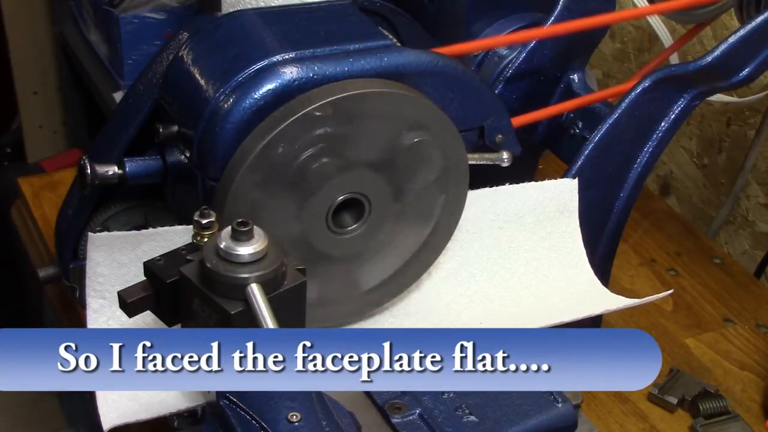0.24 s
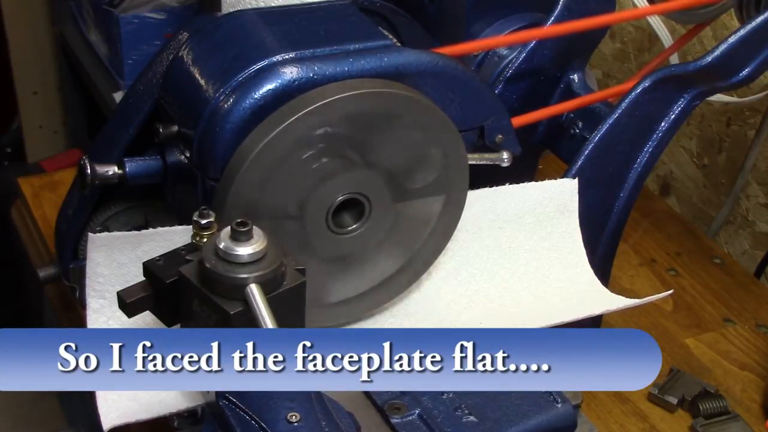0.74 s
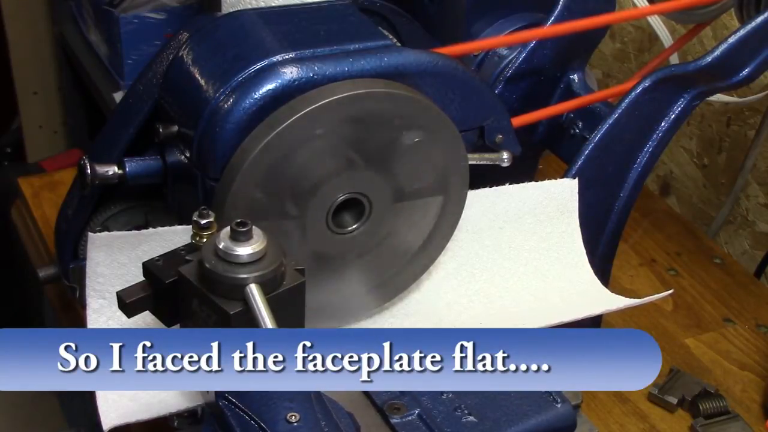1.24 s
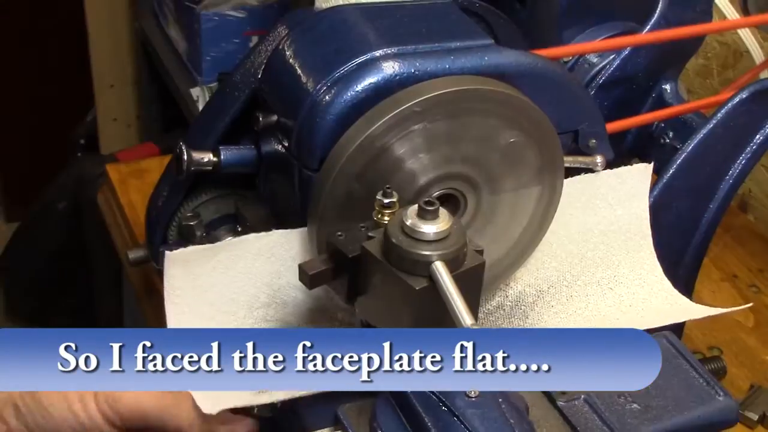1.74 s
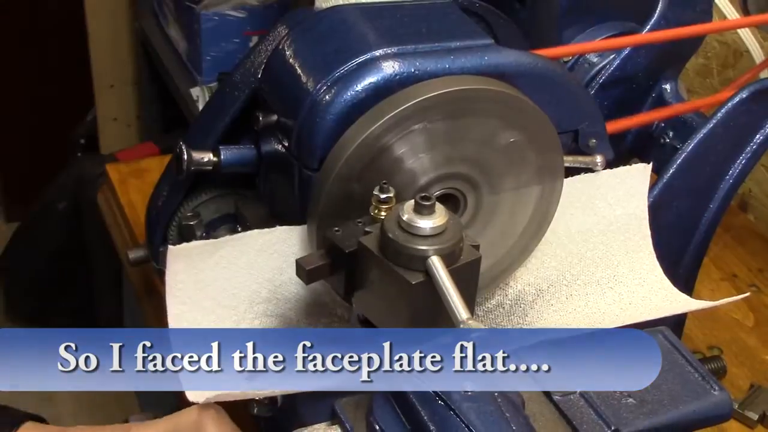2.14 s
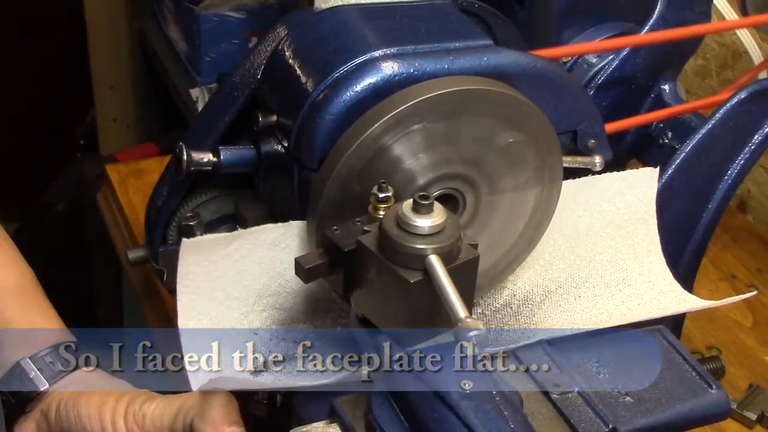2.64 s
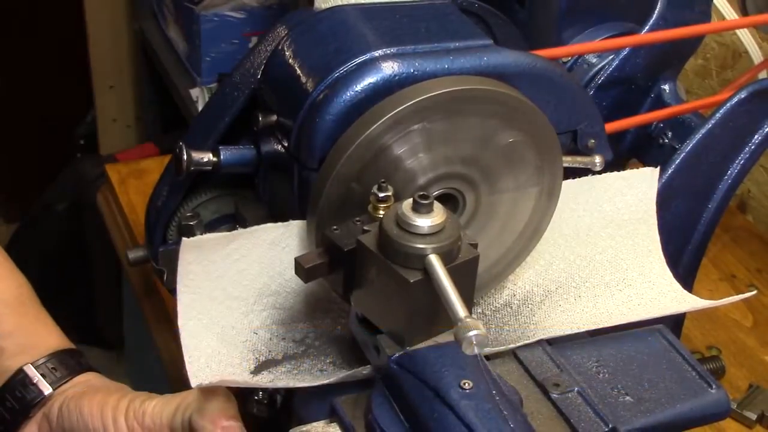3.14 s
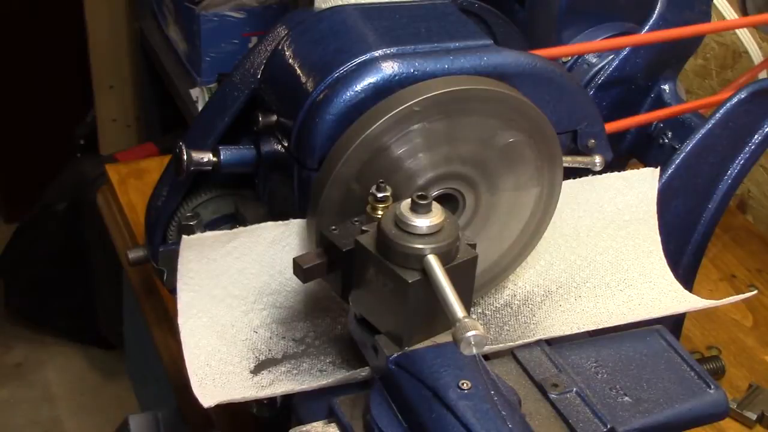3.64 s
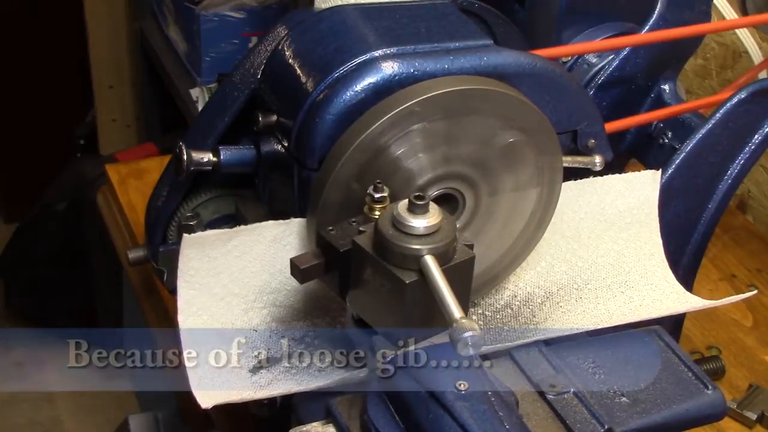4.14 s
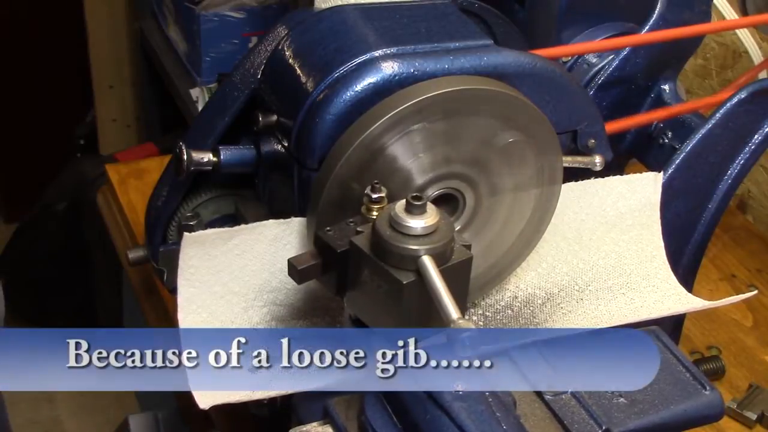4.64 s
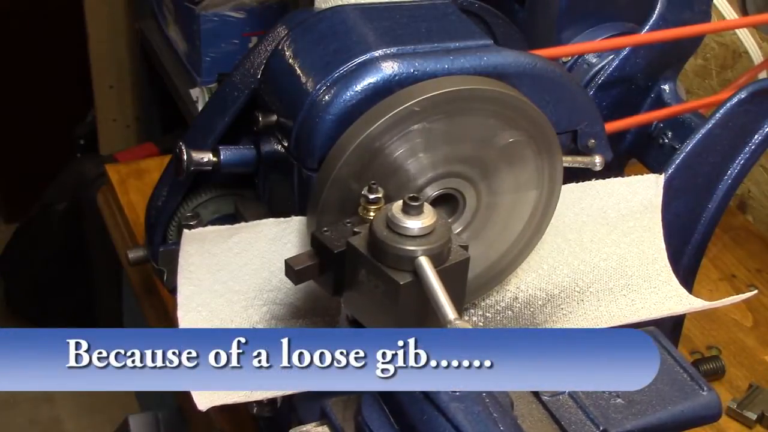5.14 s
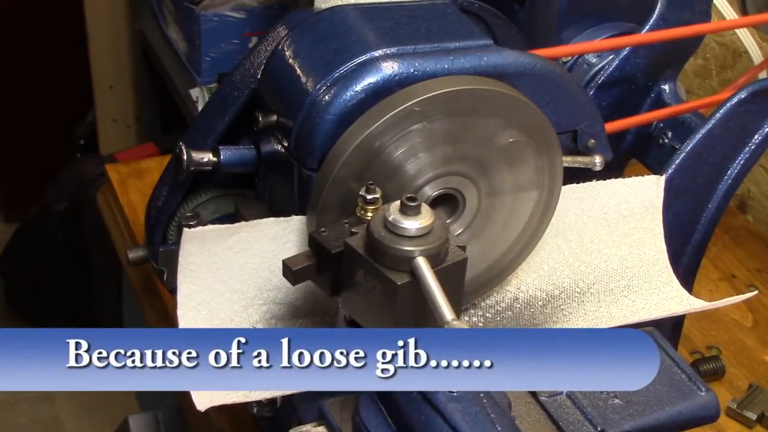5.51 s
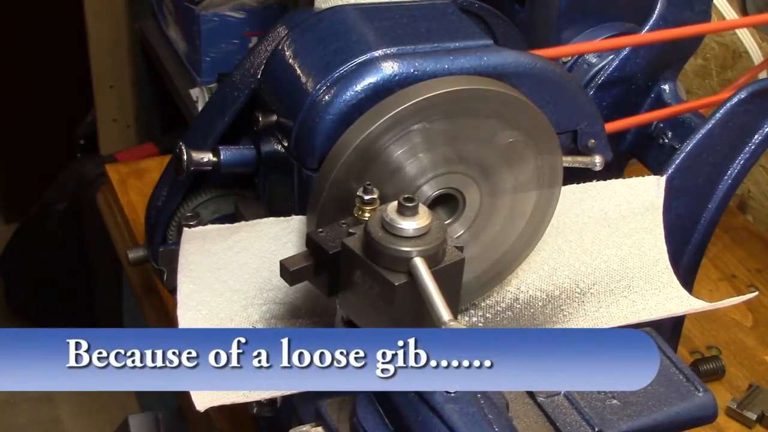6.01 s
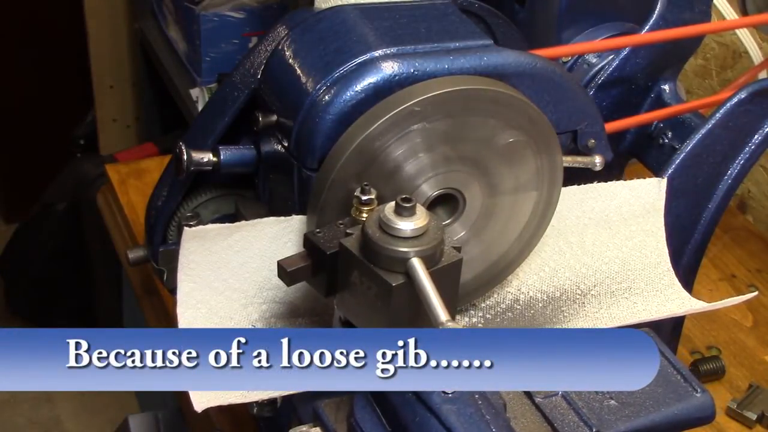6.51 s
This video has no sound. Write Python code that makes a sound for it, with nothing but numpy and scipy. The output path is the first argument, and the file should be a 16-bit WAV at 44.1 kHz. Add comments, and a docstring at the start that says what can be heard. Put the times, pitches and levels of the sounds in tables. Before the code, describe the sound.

Eight crackly metallic scrapes a second over motor rumble, then abruptly a fast-motion machining hiss with sinking whines, brief squeals and uneven chatter.

```python
"""A small lathe faces an iron plate in a home workshop. At normal speed the tool first scrapes one high spot
each turn: bursts of grit crackle and ring the plate's modes over the motor's filtered-noise rumble.
Then the work runs on in fast motion, every pitch raised many times: shaped noise hisses with a grain that
repeats each turn, gear whines (wavering sines) sink as the load slows the drive, and noise bursts knock.
As the tool goes in it squeals, a snag ticks once a turn, and the hiss swells where the tool chatters."""
import sys
import numpy as np
from scipy import signal
from scipy.io import wavfile
from scipy.ndimage import uniform_filter1d, map_coordinates

SR = 44100
rng = np.random.default_rng(int(sys.argv[2]) if len(sys.argv) > 2 else 0)


def int16_out(signal):
    """Quantize to a 16-bit WAV file."""
    q = np.round(np.clip(np.atleast_2d(signal).T, -1, 1) * 32767)
    wavfile.write(sys.argv[1], SR, q.astype(np.int16))


N = 298557
FAST_START_S = 1.619

# Motor rumble spectrum. Each row: frequency in Hz, relative density in dB per Hz.
MOTOR_SPECTRUM = [(15, -64), (25, -23.5), (240, 8), (378, 5), (762, -1), (1950, -3.5), (3090, -5.5),
                  (3530, -4), (4040, -8.5), (4870, -14), (5430, -13.5), (7910, -16), (11200, -20.5),
                  (13900, -24), (15500, -39)]
MOTOR_LEVEL_DB = -32
# Headstock casting resonances. Each entry: frequency in Hz.
HOUSING_HZ = [258, 770, 937, 1170, 2812]
# Their shape. Each row: width in Hz, lift in dB.
HOUSING_WIDTH_LIFT = [(49.7, 3), (40, 8.5), (25, 11), (59.6, 6.5), (25, 19)]

# Countershaft rate heard in fast motion. Each row: time in seconds, turns per second.
SHAFT_RATE = [(1.62, 194), (1.85, 187), (2.05, 183), (2.3, 180), (2.55, 177.5), (2.9, 175), (3.35, 172),
              (3.7, 168.5), (4.4, 166), (5.1, 163.5), (6, 162), (6.77, 161.5)]
# Plate rate heard in fast motion. Each row: time in seconds, turns per second.
PLATE_RATE = [(2.75, 165.3), (3.07, 161.7), (3.54, 160.4), (3.56, 155), (3.9, 155.3), (4.0, 154),
              (4.4, 152.5), (4.8, 151.5), (5.05, 150), (5.4, 148.7), (6.77, 148)]
# Gear whines. Each entry: multiple of the shaft rate.
GEAR_ORDERS = [2.85, 4, 5.7, 6.35, 7.3, 8, 8.5, 12, 17, 22, 23, 25, 28]
# Each row: level in dB, loudest time in seconds, time to fall 6 dB in seconds.
GEARS = [(-67, 2.05, 1), (-65.5, 3.07, 0.56), (-63, 2.1, .3), (-59, 1.9, 0.48), (-40.5, 1.22, 0.61),
         (-51.5, 1.6, 3.1), (-45.5, 2.93, 1.15), (-47, 1.75, 0.41), (-42.5, 1.7, 0.81), (-43, 1.52, 0.23),
         (-46, 2.8, 0.91), (-39, 2.34, 0.34), (-42, 7.1, 1.9)]
# Tones of steady pitch in fast motion, perhaps mains hum at 1200 Hz. Each entry: frequency in Hz.
STEADY_HZ = [1114, 1200, 1427]
# Each row: level in dB, loudest time in seconds, time to fall 6 dB in seconds.
STEADY_TONES = [(-61.5, 4.1, 6.8), (-56, 9.8, 15), (-48.5, 8.7, 3.6)]
# Tool squeals. Each entry: multiple of the plate rate.
SQUEAL_ORDERS = [11, 12, 13, 16, 17, 31]
# Each row: level in dB, loudest time in seconds, time to fall 6 dB in seconds.
SQUEALS = [(-39, 3.25, .2), (-46, 3.3, .2), (-38, 3.3, .22), (-36, 3.3, .25), (-39, 3.25, .2),
           (-36, 3.14, .06)]

# Knocks on the slide. Each row: start in seconds, level in dB, centre in Hz, hold end in seconds after
# the start, loss about one octave off in dB.
KNOCKS = [(2.257, -24.5, 3350, 0.0052, 78), (2.291, -20.5, 3400, 0.0016, 25),
          (2.2914, -18.5, 8100, .002, 10), (3.416, -15, 8300, 0.012, 7)]
# Snag ticks. Each row: time in seconds, level in dB.
SNAG_LEVEL = [(2.95, -45), (3.07, -23.5), (3.11, -30.5), (3.245, -22.5), (3.265, -54), (3.29, -21.5),
              (3.34, -28), (3.51, -27.5), (3.7, -43), (3.81, -32), (3.87, -42), (6.77, -38)]
SNAG_CONTACT_S = 3.0695  # a moment when the snag meets the tool

# High-spot bites, one a turn. Each row: time in seconds, entry click in dB, scrape crest in seconds after
# that time, crest in dB, treble share in dB, scrape t60 in seconds, exit click in dB.
BITES = [(0.066, -17.5, .017, -11, -4, 0.087, -30), (0.1882, -15.5, .013, -13.5, -3.5, 0.052, -16.5),
         (0.3068, -16, 0.013, -15.5, -0.5, 0.054, -18.5), (0.423, -17.5, 0.012, -12, -2.5, 0.1, -22),
         (0.542, -16.5, 0.017, -10.5, -2.5, .11, -21), (0.6638, -18, 0.017, -14, 0, 0.053, -18.5),
         (0.787, -18.5, 0.015, -14.5, -2.5, 0.065, -29), (0.9035, -17, 0.012, -14.5, -2.5, 0.087, -34),
         (1.024, -15.5, 0.016, -9.5, -6, 0.1, -18), (1.1415, -19, 0.016, -9, -5, 0.11, -11),
         (1.263, -17.5, 0.013, -10.5, -3.5, 0.089, -12.5), (1.384, -11.5, .020, -15.5, -4, 0.078, -12),
         (1.504, -23, 0.0094, -15, 2.5, 0.093, -20)]
CLICK_RISE_S, SWELL_AFTER_S, EXIT_AFTER_S = 0.00097, 0.0052, 0.0356
ENTRY_T60_S, ENTRY_TREBLE_DB = 0.026, 1.5
EXIT_T60_S, EXIT_TREBLE_DB = 0.046, -5.5
# Belt joint, two taps a round, bright then dull. Each row: first tap in seconds, treble share in dB,
# t60 in seconds.
JOINT_TAPS = [(0.0262, -11, 0.025), (0.0892, -23, 0.017)]
JOINT_ROUND_S = .1123
# Strength, one list for each tap. Each row: time in seconds, peak in dB.
JOINT_STRENGTH = [
    [(.03, -19.5), (.14, -38), (.4, -37), (1.49, -27), (1.6, -20)],
    [(.6, -21), (.9, -20), (1.21, -20), (1.55, -20)],
]
# Plate modes. Each entry: frequency in Hz.
PLATE_HZ = [770, 937, 1674, 2485, 2511, 2812, 2890, 3300, 3415, 3545, 4871, 4932, 5842, 6350, 7200, 8125,
            8800, 9205, 10130, 10800, 11610]
# Each row: relative level in dB, t60 in seconds.
PLATE_MODES = [(-19, 0.14), (-27.5, 0.26), (-21.5, 0.072), (-24, 0.45), (-25.5, 0.39), (-51, 0.26),
               (-37, 0.28), (-37, 0.019), (-11.5, 0.047), (-2.5, 0.035), (-6.5, 0.1), (-14.5, 0.13),
               (-9.5, 0.042), (-23, 0.012), (-11, 0.054), (-6, 0.062), (1.5, 0.011), (-2.5, 0.0074),
               (-3.5, 0.012), (-1.5, 0.015), (-7.5, 0.011)]
# Chip crackle spectrum. Each row: frequency in Hz, relative density in dB per Hz.
CHIP_SPECTRUM = [(500, -30), (1500, -53), (3500, -2), (6000, 18.5), (9000, 8.5), (12500, -35), (14500, -4),
                 (15500, -27)]

# Fast-motion hiss. Each row: time in seconds, level in dB, treble tilt in dB, share of the grain that
# repeats each turn from 0 to 1.
CUT = [(1.63, -25, -1, .2), (2.67, -23.5, -3, 0.24), (2.75, -23, -3, 0.4), (2.97, -24.5, -2, 0.4),
       (3.1, -22, -2, 0.7), (3.45, -21, -2, 0.86), (3.7, -26.5, 1, 0.41), (4.0, -24.5, 0, 0.51),
       (4.95, -25.5, 2, 0.38), (5.85, -25, 4, 0.2), (6.77, -25, 3, 0.29)]
# Hiss spectrum. Each row: frequency in Hz, relative density in dB per Hz.
HISS_SPECTRUM = [(24, -81), (40, -50), (254, -44), (474, -28), (706, -29), (800, -26.5), (1030, -25),
                 (1160, -17), (1650, -11.5), (2650, -3.5), (3490, -4.5), (7380, -5.5), (8570, -11),
                 (10200, -6.5), (15600, -11)]
# Four stages of the hiss: idle running, then three of cutting. Entries alternate: start in seconds,
# end in seconds.
STAGE_EDGES_S = [1.62, 2.68, 3.05, 3.52, 3.6, 5.08, 5.18, 6.77]
TREBLE_EARLY_S = .28  # resonances above 9 kHz reach their first cutting stage this much sooner
# Slide resonances. Each entry: mean frequency in Hz.
SLIDE_HZ = [790, 1850, 2100, 2660, 2980, 3270, 3700, 4090, 5000, 5330, 6600, 7350, 8150, 10600, 11850,
            12380, 13250, 13850, 12800]
# Each row: width in Hz, then mean lift in dB in each of the four stages.
SLIDE_LIFTS = [(64.8, 14, 7.8, 11.5, 13), (279, 4, 9.4, 3.5, 4), (140, 2.5, 6, 8, 6.5),
               (225, 4.5, 9.6, 15, 12.5), (136, -4.5, 8.1, 12.5, 10), (140, 0, 8.6, 3, 4.5),
               (100, -6, 1.1, 0, 1.5), (280, -6, 3, 12, 16), (303, 1, 6.7, 5.5, 8), (162, 3.5, 3.5, 6, 6.5),
               (540, 0.5, 1, -2.5, -7), (378, 3, 8.7, 4.5, 5), (185.19, -3, 15, 8.5, 6),
               (1590, -2, 1.6, 4, -2.5), (395, -10, 7.6, 9.5, 8), (248, 3, 5, 4, 12),
               (300, -10, 8.7, 4.5, 9.5), (200, -7, 5, 6, -3), (500, 0, 5.5, 2, 0.5)]
# Chatter: the lower hiss swells and repeats more. Each row: time in seconds, swell in dB,
# half length (to 1/e) in seconds.
CHATTER = [(3.685, 2.5, 0.025), (3.805, 4, 0.031), (4.742, 2.5, 0.043), (4.862, 3, 0.033),
           (5.155, 3, 0.054), (5.377, 2, 0.034), (5.884, 3, .04)]
SAME_PER_CHATTER_DB = 0.02
THROB_MAX_DB, THROB_LAG_TURNS = 2.5, .1

# Side signal, normal speed. Each row: frequency in Hz, side relative to mid in dB.
SIDE_SLOW = [(60, -17), (150, -32), (380, -15), (950, -31), (2380, -34), (5980, -11), (15000, -20)]
# Side signal, fast motion. Each row: frequency in Hz, side relative to mid in dB.
SIDE_FAST = [(60, -17), (150, -12), (380, -37), (950, -39), (2380, -78), (5980, -52), (15000, -28)]
EDGE_HZ = 15900


def amp(db):
    """Decibels to gain."""
    return 10 ** (np.asarray(db) / 20)


def unit(x):
    """Scales to rms 1."""
    return x / np.sqrt(np.mean(x ** 2) + 1e-20)


def read(points, hz):
    """Reads a spectrum table on a log-frequency axis."""
    f, value = np.transpose(points)
    return np.interp(np.log(hz + 1), np.log(f + 1), value)


def shaped(x, gain, size=512):
    """Weights the short-time spectrum of x by gain(hz, s)."""
    overlap = size * 3 // 4
    hz, s, z = signal.stft(x, SR, nperseg=size, noverlap=overlap)
    return signal.istft(z * gain(hz[:, None], s), SR, nperseg=size, noverlap=overlap)[1][:len(x)]


def patches(hz, s, bins, frames):
    """Random blotches over time and frequency, rms 1."""
    field = rng.standard_normal((len(s), len(hz))).T
    return unit(uniform_filter1d(uniform_filter1d(field, bins, 0), frames, 1))


def drift(per_s):
    """Random wander through per_s knots a second (below 200), rms 1."""
    knots = rng.standard_normal(int(N / SR * 200) + 2)
    return unit(np.interp(np.arange(N) / SR * per_s, np.arange(len(knots)), knots))


def revolutions(rates):
    """Turns made so far: the integral of a table of turning rates."""
    return np.cumsum(np.interp(np.arange(N) / SR, *np.transpose(rates))) / SR


def snag_turns():
    """Plate turns, whole when the snag meets the tool."""
    turns = revolutions(PLATE_RATE)
    return turns + 1 - turns[round(SNAG_CONTACT_S * SR)] % 1


def grain(turns, memory):
    """Roughness round a wheel, read as it turns and partly renewed each turn."""
    fresh = rng.standard_normal((int(turns[-1]) + 2, 280))
    surface = unit(signal.lfilter([1], [1, -memory], fresh, axis=0))
    surface = signal.resample(surface, 2240, axis=1)
    return map_coordinates(surface, [turns // 1, turns % 1 * 2239], order=1)


def motor():
    """Motor, belts and bearings rumble steadily; the casting's resonances lift the noise."""
    def colour(hz, s):
        lift_db = sum(db / (1 + (2 * (hz - f) / width) ** 2)
                      for f, (width, db) in zip(HOUSING_HZ, HOUSING_WIDTH_LIFT))
        return amp(read(MOTOR_SPECTRUM, hz) + lift_db + patches(hz, s, bins=9, frames=5))
    return amp(MOTOR_LEVEL_DB) * unit(shaped(rng.standard_normal(N), colour, size=2048))


def whines():
    """Gear tones follow the slowing shaft, steady tones stay put, squeals follow the plate; all waver."""
    t = np.arange(N) / SR
    shaft, plate = revolutions(SHAFT_RATE), revolutions(PLATE_RATE)
    cycles = [k * shaft for k in GEAR_ORDERS]
    cycles += [hz * t for hz in STEADY_HZ]
    cycles += [k * plate for k in SQUEAL_ORDERS]
    out = np.zeros(N)
    for c, (db, loudest_s, fade_s) in zip(cycles, GEARS + STEADY_TONES + SQUEALS):
        level_db = db - 6 * ((t - loudest_s) / fade_s) ** 2 + 2.5 * drift(10)
        phase_cycles = c + rng.random() + 0.09 * drift(25)
        out += amp(level_db) * np.sqrt(2) * np.sin(2 * np.pi * phase_cycles)
    return out


def knocks():
    """Knocks on the slide: short bursts of noise in one wide band."""
    out = np.zeros(N)
    t = np.arange(1000) / SR
    for s, db, hz, hold_s, octave_db in KNOCKS:
        def band(f, _):
            return amp(-octave_db * np.log2((f + 50) / hz) ** 2)
        burst = unit(shaped(rng.standard_normal(1000), band, size=256))
        attack = np.clip(t / 0.0011, 0, 1)
        decay = amp(-np.maximum(t - hold_s, 0) * 4400)  # dB per second
        out[round(s * SR):][:1000] += amp(db) * burst * attack * decay
    return out


def ticks():
    """A snag on the plate flicks the tool once a turn, with new force and partly new grain each time."""
    turns = snag_turns()
    force = amp(1.9 * rng.standard_normal(int(turns[-1]) + 1))[turns.astype(int)]
    decay = amp(-(turns % 1) * 45)  # dB per turn
    flick = unit(grain(turns, memory=.7) * force * decay)

    def colour(hz, s):
        return amp(-13.0 * np.log2((hz + 50) / 7400) ** 2 + 2.5 * patches(hz, s, bins=6, frames=30))
    flick = unit(shaped(flick, colour, size=128))
    return amp(np.interp(np.arange(N) / SR, *np.transpose(SNAG_LEVEL))) * flick


def contacts():
    """Every touch that excites the plate: (time s, rise s, peak dB, treble share dB, t60 s)."""
    rows = []
    for s, entry_db, crest_s, crest_db, treble_db, t60_s, exit_db in BITES:
        rows += [(s, CLICK_RISE_S, entry_db, ENTRY_TREBLE_DB, ENTRY_T60_S),
                 (s + SWELL_AFTER_S, crest_s - SWELL_AFTER_S, crest_db, treble_db, t60_s),
                 (s + EXIT_AFTER_S, CLICK_RISE_S, exit_db, EXIT_TREBLE_DB, EXIT_T60_S)]
    for (first_s, treble_db, t60_s), strength in zip(JOINT_TAPS, JOINT_STRENGTH):
        rows += [(s, CLICK_RISE_S, np.interp(s, *np.transpose(strength)), treble_db, t60_s)
                 for s in np.arange(first_s, FAST_START_S, JOINT_ROUND_S)]
    return rows


def scrapes():
    """Each contact is a dying run of uneven grit that crackles and rings the plate's modes."""
    n, t = int(FAST_START_S * SR), np.arange(6000) / SR
    low, high = np.zeros(n + 6000), np.zeros(n + 6000)
    for s, rise_s, db, treble_db, t60_s in contacts():
        attack = np.sin(np.pi / 2 * np.clip(t / rise_s, 0, 1)) ** 2
        shape = attack * amp(db - 60 * np.maximum(t - rise_s, 0) / t60_s)
        at = round((s - .0015) * SR)  # the tool digs in a little before the bite peaks
        low[at:at + 6000] += shape
        high[at:at + 6000] += shape * amp(treble_db)
    low, high = low[:n], high[:n]
    grain_db = 1.6 * np.repeat(rng.exponential(1, n // 12 + 1), 12)[:n]
    grit = unit(rng.standard_normal(n) * amp(grain_db))

    t, ringing = np.arange(SR // 2) / SR, np.zeros(n)
    for hz, (db, t60_s) in zip(PLATE_HZ, PLATE_MODES):
        if hz > 5400:
            envelope = high
        elif hz > 4400:
            envelope = np.sqrt(low * high)
        else:
            envelope = low
        # the contact point moves, so each mode is caught now strongly, now weakly
        force = grit * envelope * amp(2.0 * drift(120)[:n])
        mode = amp(db - 60 * t / t60_s) * np.sin(2 * np.pi * hz * t)
        ringing += signal.oaconvolve(force, mode)[:n]

    def chip_colour(hz, s):
        return amp(read(CHIP_SPECTRUM, hz) + 7.5 * patches(hz, s, bins=6, frames=5))
    crackle = unit(shaped(grit, chip_colour, size=256)) * (high + 0.12 * low)
    highpass = signal.butter(4, 600, "high", fs=SR, output="sos")
    both = signal.sosfilt(highpass, amp(-25) * ringing + amp(-10.5) * crackle)
    return np.pad(both, (0, N - n))


def stage_edges(hz):
    """Start and end of each stage for a resonance, in seconds."""
    first_cut_start = np.arange(len(STAGE_EDGES_S)) == 2
    return np.array(STAGE_EDGES_S) - TREBLE_EARLY_S * (hz > 9000) * first_cut_start


def cut():
    """Hiss with combs of turn harmonics: once cutting, the tool meets nearly the same surface every turn."""
    t = np.arange(N) / SR
    s, level_db, tilt_db, same = np.transpose(CUT)
    chatter_db = sum(db * np.exp(-((t - at) / half_s) ** 2) for at, db, half_s in CHATTER)
    same = np.clip(np.interp(t, s, same) + SAME_PER_CHATTER_DB * chatter_db, 0, .9)
    cutting = np.clip((t - 2.65) / 1.1, 0, 1)  # the plate's comb takes over when the tool goes in
    shaft_share = 1 - 0.86 * cutting
    plate_grain = grain(revolutions(PLATE_RATE), memory=.97)
    shaft_grain = grain(revolutions(SHAFT_RATE), memory=0.95)
    repeats = np.sqrt(1 - shaft_share) * plate_grain + np.sqrt(shaft_share) * shaft_grain

    # above 1600 Hz, part of the noise gives way to the repeating grain
    split = signal.firwin(401, 1600, fs=SR)
    noise = rng.standard_normal(N)
    upper = np.sqrt(same) * repeats + (np.sqrt(1 - same) - 1) * noise
    drive = noise + upper - signal.oaconvolve(upper, split, "same")

    def colour(hz, at):
        step = np.minimum(at * SR, N - 1).astype(int)
        lift_db = 0
        for f, (width, *stage_db) in zip(SLIDE_HZ, SLIDE_LIFTS):
            # each resonance swells and wanders on its own
            peak_db = np.interp(at, stage_edges(f), np.repeat(stage_db, 2)) * (1 + .1 * drift(22)[step])
            centre_hz = f * (1 + .004 * drift(4)[step])
            lift_db = lift_db + peak_db / (1 + (2 * (hz - centre_hz) / width) ** 2)
        treble = np.clip((hz - 4500) / 2000, 0, 1)
        tilt = (np.interp(at, s, tilt_db) - chatter_db[step]) * treble  # chatter spares the treble
        return amp(read(HISS_SPECTRUM, hz) + lift_db + tilt + 1.2 * patches(hz, at, bins=12, frames=10))
    hiss = unit(shaped(drive, colour, size=1024))
    # throbs once a turn, lagging the snag
    throb = np.cos(2 * np.pi * (snag_turns() - THROB_LAG_TURNS))
    throb_db = THROB_MAX_DB * cutting * same ** 2 * throb
    return amp(np.interp(t, s, level_db) + throb_db + chatter_db + 0.5 * drift(30)) * hiss


def scene():
    """Normal speed gives way at once to fast motion; nearly mono, with a faint random-phase copy as side."""
    fast = np.clip((np.arange(N) / SR - FAST_START_S) / 0.00092, 0, 1)
    slow_part = motor() + scrapes()
    fast_part = whines() + knocks() + ticks() + cut()
    mid = (1 - fast) * slow_part + fast * fast_part

    def side_gain(hz, s):
        side_db = np.where(s < FAST_START_S, read(SIDE_SLOW, hz), read(SIDE_FAST, hz))
        random_phase = np.exp(2j * np.pi * rng.random((len(s), len(hz))).T)
        return amp(side_db + 5.4 * patches(hz, s, bins=5, frames=30)) * random_phase
    side = shaped(mid, side_gain, size=256)
    return np.array([mid + side, mid - side])


def record(dry):
    """The preamplifier rounds off the tallest peaks; then a low-pass limits the band."""
    rounded = dry / (1 + (dry / .7) ** 4) ** (1 / 4)
    lowpass = signal.firwin(511, EDGE_HZ, window=("kaiser", 9), fs=SR)
    return signal.oaconvolve(rounded, lowpass[None], "same")


dry = scene()
out = record(dry)
int16_out(out)
```